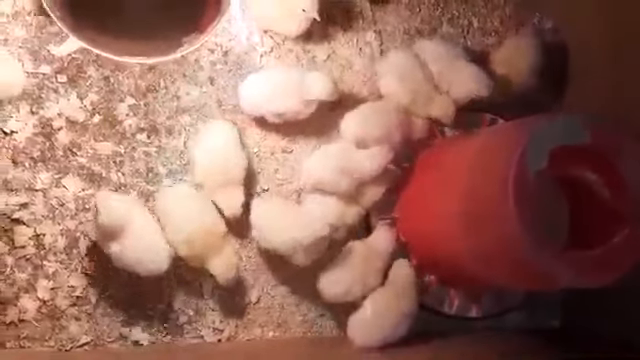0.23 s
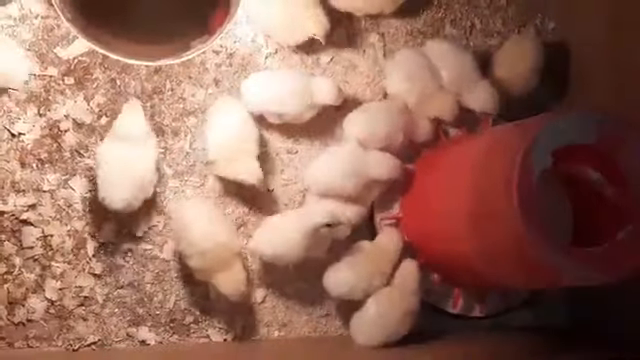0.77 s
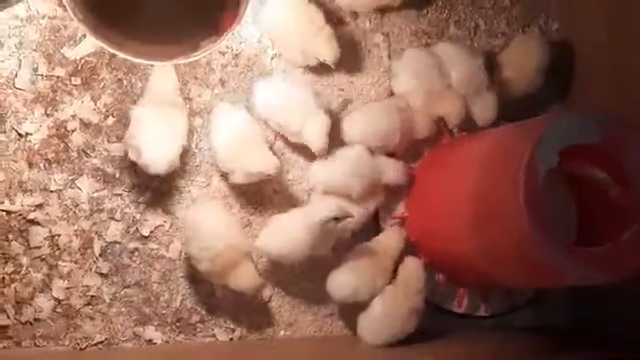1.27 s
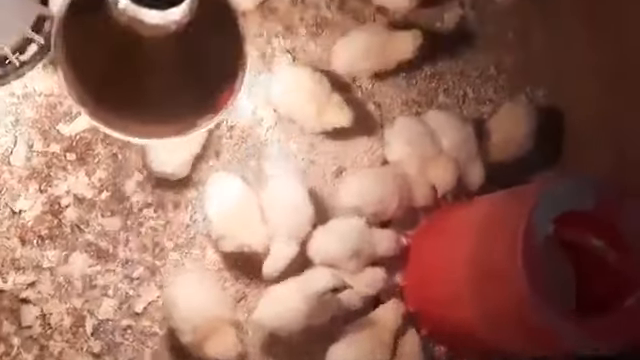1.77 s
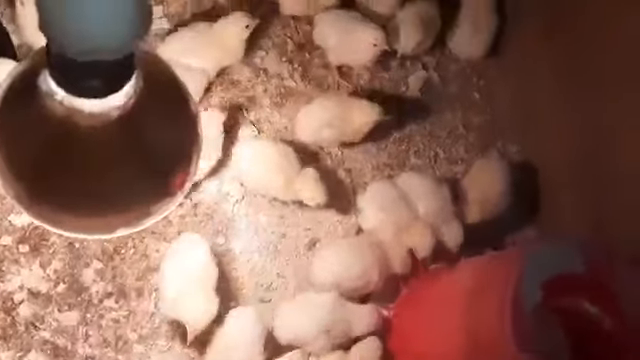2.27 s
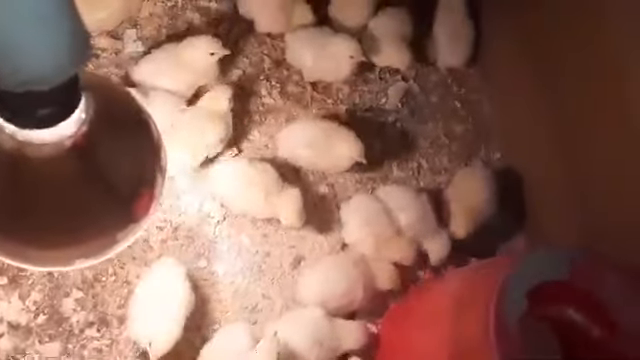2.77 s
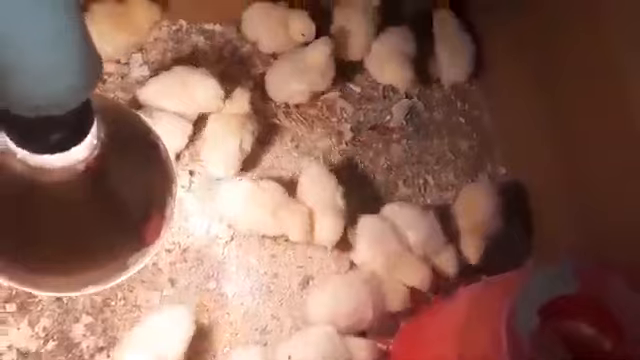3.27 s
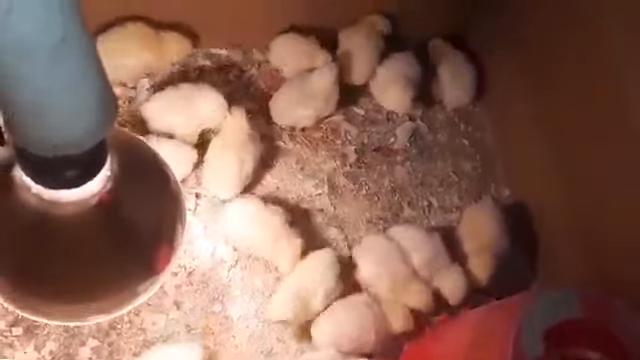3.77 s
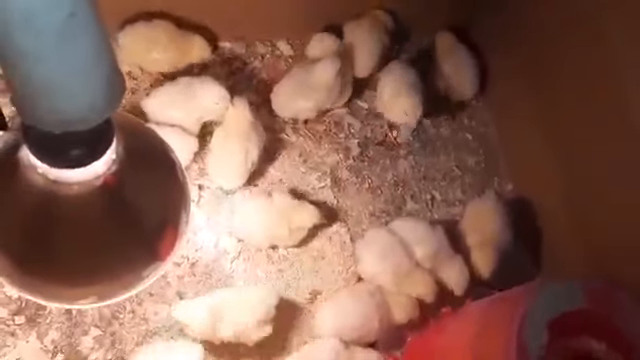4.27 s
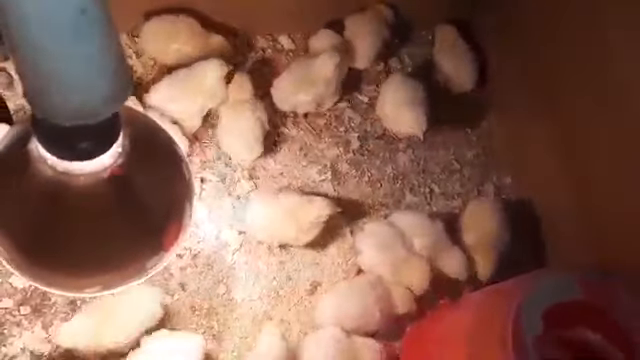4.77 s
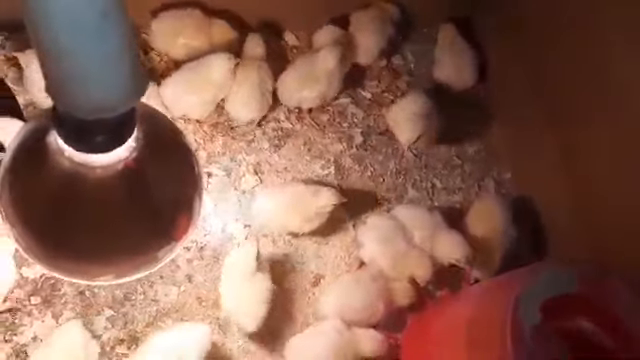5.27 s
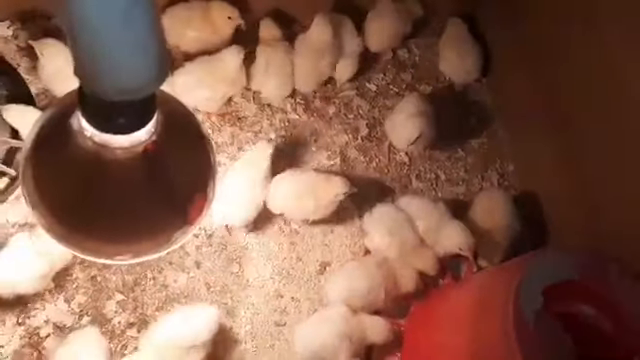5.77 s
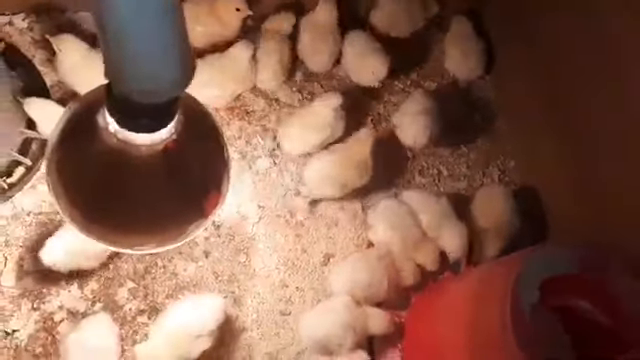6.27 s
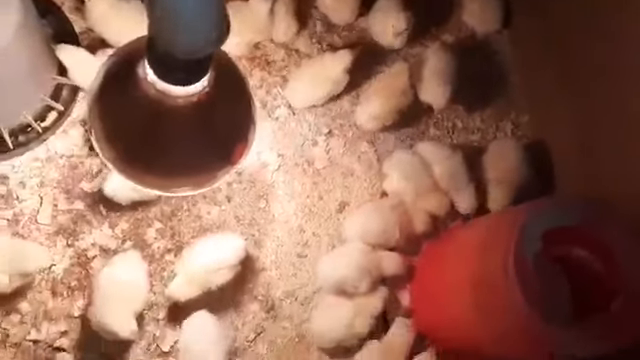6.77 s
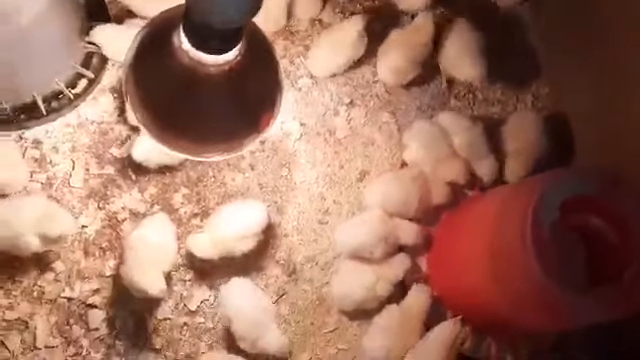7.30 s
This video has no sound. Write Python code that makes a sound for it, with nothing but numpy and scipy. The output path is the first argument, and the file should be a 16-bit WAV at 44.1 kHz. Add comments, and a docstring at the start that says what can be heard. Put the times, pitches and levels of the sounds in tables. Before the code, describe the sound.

A flock of young chicks peeps constantly in a wooden brooder, with rustling litter, small ticks and pecks, and occasional soft boomy knocks.

```python
"""A flock of chicks peeps in a wooden brooder, heard from above, over rustling litter and quiet air.
From the start short falling whistles and a few rising chirps ring out, smeared by the walls and the room;
soft knocks boom in the box from the first moment, then come dry ticks, gritty rakes and dull pecks.
Trills, gliding tones with a zigzag pitch, join after a second; one chick squeals at about two seconds.
The two strongest knocks fall at about 5 and 6.4 s; peeps and stirring go on to the end."""
import sys
import numpy as np
from scipy import signal
from scipy.fft import rfft, irfft
from scipy.io import wavfile
from scipy.ndimage import uniform_filter1d

SR = 44100
rng = np.random.default_rng(int(sys.argv[2]) if len(sys.argv) > 2 else 0)


def dump_mix(stems):
    """Bounce the given channels to the path in sys.argv[1] as a 16-bit WAV at rate SR."""
    frames = np.atleast_2d(stems).T  # one column per channel
    limited = np.clip(frames, -1, 1)  # hard clip at full scale
    pcm = np.round(limited * 32767).astype(np.int16)
    wavfile.write(sys.argv[1], SR, pcm)


N = 332514
TIME = np.arange(N) / SR


def amp(db):
    """Decibels to an amplitude factor."""
    return 10 ** (np.asarray(db) / 20)


def unit(x):
    """Scale to an RMS of one."""
    return x / np.sqrt(np.mean(x ** 2) + 1e-20)


def read(points, hz):
    """Read a curve of (f/Hz, value) points along a logarithmic frequency axis."""
    f, value = np.transpose(points)
    return np.interp(np.log(hz + 1), np.log(f + 1), value)


def colour(x, points):
    """Equalise a sound with a curve of (f/Hz, gain/dB) points."""
    gain = amp(read(points, np.fft.rfftfreq(x.shape[-1], 1 / SR)))
    return irfft(rfft(x) * gain, x.shape[-1])


def pan(db):
    """Left and right gains that differ by db; positive is louder on the left."""
    return unit(amp([[db / 2], [-db / 2]]))


def add(mix, s, sound):
    """Lay a sound into the mix at s seconds, cut off at the end of the mix."""
    part = mix[:, max(round(s * SR), 0):][:, :sound.shape[-1]]
    part += sound[..., :part.shape[1]]


def narrow(x, corner_hz=650):
    """Long waves reach both microphones alike; short ones differ."""
    f = np.fft.rfftfreq(x.shape[-1], 1 / SR)
    side_gain = (f + 30) / np.hypot(f + 30, corner_hz)
    side = irfft(rfft(x[1]) * side_gain, x.shape[-1])
    return np.array([x[0] + side, x[0] - side])


def room(x):
    """Dense echoes, other ones at each microphone, each band dying at its own speed."""
    # reverberation time of the room: (f/Hz, t60/s)
    room_t60 = [(200, 0.48), (1000, 0.51), (3000, 0.31), (6000, 0.3), (14000, 0.15)]
    hz, t, z = signal.stft(rng.standard_normal((2, SR // 2)), SR, nperseg=256)
    fade = amp(-60 * t / read(room_t60, hz)[:, None])
    build_up = 1 - np.exp(-t / 0.014)
    tail = signal.istft(z * fade * build_up, SR, nperseg=256)[1]
    # about unit gain where the chicks call, 2400 to 4000 Hz (bins 1 Hz apart)
    in_band = abs(rfft(tail, SR))[:, 2400:4000]
    tail = tail / np.sqrt(np.mean(in_band ** 2))
    return signal.oaconvolve(x, tail, axes=1)[:, :N]


def walls(x, count=4, strength=.55):
    """A few early reflections, drawn anew for each call: they beat against a gliding tone."""
    taps = np.zeros((2, SR // 60))
    for side in taps:
        delays = rng.integers(SR // 600, SR // 70, count)
        side[delays] = strength * rng.choice([-1, 1], count) / np.sqrt(count)
    # the direct sound reaches the right a little before or after the left
    taps[0, 14] = taps[1, rng.integers(0, 28)] = 1
    heard = signal.fftconvolve(x[None], taps, axes=1)
    # each side keeps the energy of the dry call
    return heard * np.linalg.norm(x) / np.linalg.norm(heard, axis=1, keepdims=True)


def whistle(hz, crest, waver=0.0085, fullness=0.37):
    """A chick's syrinx: a nearly pure tone that swells to its crest and fades, fluttering a little."""
    # second and third harmonic of a call, typical value: (level/dB, level/dB)
    overtones_db = (-29.5, -37.5)
    drift, flutter = unit(uniform_filter1d(rng.standard_normal((2, len(hz))), SR // 200))
    phase = 2 * np.pi * np.cumsum(hz * (1 + waver * drift)) / SR
    second_db, third_db = overtones_db + rng.normal(0, 2, 2)
    tone = np.sin(phase) + amp(second_db) * np.sin(2 * phase) + amp(third_db) * np.sin(3 * phase)
    flutter_gain = amp(2.8 * uniform_filter1d(flutter, SR // 500))
    # warped time puts the top of the half sine at the crest; a low fullness exponent flattens it
    u = np.interp(np.linspace(0, 1, len(hz)), [0, np.clip(crest, .1, .9), 1], [0, .5, 1])
    swell = abs(np.sin(np.pi * u)) ** fullness
    return unit(tone * flutter_gain * swell)


def glide(length, first, middle, last):
    """Pitch bends smoothly through three points."""
    u = np.linspace(0, 1, max(int(length * SR), 200))
    return np.polyval(np.polyfit([0, .5, 1], [first, middle, last], 2), u)


def bowed_glide(length, first, last, bow):
    """A glide whose middle lies above a straight line by bow, a share of the mean pitch."""
    return glide(length, first, (first + last) / 2 * (1 + bow), last)


def still_air(level_db=-68):
    """The quiet floor of the room: steady coloured noise, wider in the treble."""
    # tone of the air: (f/Hz, gain/dB)
    air_colour = [(20, -22), (38, -1), (50, 26.5), (65, 3.5), (120, 17), (300, -26), (1000, -11),
                  (5000, -7.5), (15000, -61)]
    return amp(level_db) * unit(colour(narrow(rng.standard_normal((2, N))), air_colour))


def crackle(per_s, spread, wash, low_hz, high_hz, cycles, count=22):
    """Many tiny contacts of unequal size, each ringing at its band's pitch, over a steady wash of noise."""
    out = np.zeros((2, N))
    for hz in np.geomspace(low_hz, high_hz, count):
        t = np.arange(int(5 * cycles / hz * SR)) / SR
        grain = np.exp(-t * hz / cycles) * np.sin(2 * np.pi * hz * t) * np.sqrt(hz)
        # small, high-pitched contacts are the most common; only the top band gets its full share
        share = hz / high_hz
        contacts = int(per_s * share * N / SR / count)
        when, size, left, right = rng.random((6000, 4))[:contacts].T
        strength = amp(spread * np.minimum(-np.log(size), np.pi))
        hits = np.zeros((2, N))
        hits[:, (when * N).astype(int)] = strength * (np.array([left, right]) - .5)
        out += signal.oaconvolve(hits, grain[None], axes=1)[:, :N]
    noise = colour(rng.standard_normal((2, N)), [(high_hz, 0), (high_hz * 2, -12)])
    return unit(out) + wash * unit(noise)


def footwork():
    """Strength of rustle and shuffle: each step swells quickly and fades over the steady stirring."""
    # the flock's steady stirring, before the litter's trims: (t/s, crisp rustle level/dB, dull shuffle level/dB)
    stirring = [(0, -62.5, -62.5), (.65, -62, -60), (1.0, -60.5, -54.5), (1.38, -65.5, -60.5),
                (1.55, -60.5, -57), (2.2, -60.5, -58.5), (2.34, -67, -65), (3.1, -61, -63.5),
                (3.68, -64, -69), (3.95, -63.5, -59.5), (4.38, -64.5, -78), (5.3, -67, -66.5),
                (5.82, -66.5, -70.5), (6.15, -57.5, -56), (6.55, -67, -71), (7.0, -65, -66.5),
                (7.25, -59.5, -57), (7.54, -60, -52.5)]
    # single steps that stand out, before the same trims:
    # (t/s, length/s, crisp rustle level/dB, dull shuffle level/dB)
    steps = [(.16, 0.25, -69, -75), (0.778, 0.12, -62, -53.5), (0.872, 0.068, -63, -52),
             (1.265, 0.16, -71, -52), (1.574, 0.25, -66, -56), (1.947, 0.11, -59, -74),
             (2.363, 0.11, -55, -61), (2.44, 0.067, -54.5, -53), (2.59, 0.11, -61.5, -81),
             (2.832, .13, -76, -54), (3.54, 0.13, -70, -56.5), (3.804, 0.089, -65, -51.5),
             (3.949, 0.092, -60.5, -58.5), (4.131, 0.17, -52.5, -57.5), (4.439, 0.1, -60, -66),
             (4.645, 0.22, -59.5, -66), (4.895, 0.29, -61, -56.5), (5.255, .11, -62.5, -55.5),
             (5.459, 0.16, -59.5, -56.5), (5.601, 0.17, -55.5, -59), (5.842, 0.21, -60.5, -63.5),
             (6.037, .07, -58, -54), (6.219, 0.11, -62, -53), (6.393, 0.16, -64, -61.5),
             (6.574, 0.18, -58, -53), (6.753, 0.14, -63, -58.5), (6.879, 0.087, -57, -54.5),
             (7.014, 0.1, -60, -60)]
    step_crest = 0.23  # where a step is loudest, as a share of its length
    s, crisp_db, dull_db = np.transpose(stirring)
    power = amp([np.interp(TIME, s, crisp_db), np.interp(TIME, s, dull_db)]) ** 2
    for start, length, crisp, dull in steps:
        swell = np.interp(np.linspace(0, 1, int(length * SR)), [0, step_crest, 1], [0, 1, 0])
        add(power, start, amp([[crisp], [dull]]) ** 2 * np.sin(np.pi / 2 * swell) ** 2)
    return np.sqrt(power)


def litter(rustle_db=4.5, shuffle_db=2.5, side_db=3, scratch_db=1.3):
    """Feet stir the shavings in short scratches and scuff the floor beneath."""
    # tone of the crisp shavings: (f/Hz, gain/dB)
    rustle_colour = [(900, -1.5), (2000, -1.5), (4500, 4), (6000, -2), (7800, -1), (9000, -6.5),
                     (11500, -4), (14000, -8), (15200, -13)]
    # tone of the dull scuffs: (f/Hz, gain/dB)
    shuffle_colour = [(40, -45), (80, 9), (200, -1.5), (360, -1), (560, 1), (1000, -5.5), (1600, -11),
                      (2500, -7.5), (5000, -42)]
    crisp, dull = footwork()
    snaps = crackle(per_s=9000, spread=3.4, wash=1.3, low_hz=2000, high_hz=14000, cycles=5)
    scuffs = crackle(per_s=2600, spread=3.0, wash=.7, low_hz=130, high_hz=2400, cycles=7)
    slow_noise = uniform_filter1d(rng.standard_normal(N), SR // 50)
    scratches = unit(uniform_filter1d(slow_noise, SR // 250))
    rustle = unit(colour(snaps, rustle_colour)) * crisp * amp(rustle_db + scratch_db * scratches)
    shuffle = unit(colour(narrow(scuffs), shuffle_colour)) * dull * amp(shuffle_db)
    return pan(side_db) * rustle + shuffle


def rakes(level_db=0, grain_db=2.5):
    """A foot rakes through the shavings: a quick, gritty swish that swells early and dies away."""
    # rakes: (t/s, length/s, level/dB, brightest f/Hz)
    rake_table = [(0.754, 0.075, -60, 8000), (2.365, 0.18, -65, 11000), (4.15, 0.075, -56, 7500),
                  (4.627, .13, -54.5, 11300), (5.625, .13, -70, 7000)]
    out = np.zeros((2, N))
    for s, length, db, hz in rake_table:
        u = np.linspace(0, 1, int(length * SR))
        grit = unit(uniform_filter1d(rng.standard_normal(len(u)), SR // 300))
        noise = rng.standard_normal((2, len(u)))
        swish = unit(colour(noise, [(hz / 8, -22), (hz, 0), (hz * 2, -8)]))
        envelope = unit(amp(grain_db * grit) * u * (1 - u) ** 2)
        add(out, s, amp(db + level_db) * swish * envelope)
    return out


def pecks(level_db=1, decay=0.0045, room_db=-7):
    """A beak hits a board under the litter: one broad, damped resonance, shaped from noise."""
    # duller pecks on the boards: (t/s, onset level/dB before trim, f/Hz)
    peck_table = [(.893, -43.5, 800), (1.597, -42, 700), (2.105, -54, 990), (2.39, -40.5, 1110),
                  (2.462, -38.5, 1070), (2.854, -44.5, 756), (3.745, -48, 980), (4.437, -47.5, 1060),
                  (4.457, -41, 900), (6.073, -46.5, 1100), (6.246, -56, 1000), (6.608, -40.5, 1000),
                  (6.626, -45, 1110), (6.78, -47, 1030)]
    out, t = np.zeros((2, N)), np.arange(SR // 20) / SR
    for s, db, hz in peck_table:
        resonance = [(hz / 4, -20), (hz, 0), (hz * 2, -12), (hz * 8, -40)]
        burst = unit(colour(narrow(rng.standard_normal((2, len(t)))), resonance))
        add(out, s, amp(db + level_db) * burst * np.exp(-t / decay))
    return out + amp(room_db) * room(out)


def ticks(level_db=-10, decay=0.014, room_db=-4):
    """Beaks and claws snap a shaving: a bright noise burst with a very short decay."""
    # dry ticks: (t/s, onset level/dB before trim, left-right/dB before halving)
    tick_table = [(0.1873, -38, -1), (0.2275, -41, 2), (0.5425, -34, -6), (0.636, -37.5, -3),
                  (0.893, -33, -2), (0.9057, -35, 0), (1.491, -42, -13), (1.503, -33.5, -6),
                  (1.917, -45, -15), (1.9723, -38, -1), (2.0475, -36, 1), (2.103, -37, -1),
                  (2.3652, -36, 1), (2.387, -39, 6), (2.459, -39.5, -14), (3.0327, -46, -6),
                  (3.8248, -35, -9), (4.1535, -34, 4), (4.1859, -25.5, -3), (4.4591, -38.5, -2),
                  (4.9556, -36, -3), (5.86, -38, -15), (6.0462, -41, 3), (7.5198, -39, -3)]
    # tone of a tick: (f/Hz, gain/dB)
    tick_colour = [(300, 4), (1500, 4.5), (4300, 16.5), (6500, 2.5), (8000, 6.5), (12000, 1.5),
                   (15000, -14)]
    out, t = np.zeros((2, N)), np.arange(SR // 30) / SR
    for s, db, side_db in tick_table:
        burst = unit(colour(rng.standard_normal((2, len(t))), tick_colour))
        add(out, s, amp(db + level_db) * pan(side_db / 2) * burst * np.exp(-t / decay))
    return out + amp(room_db) * room(out)


def knocks(ring_db=-2, boom_db=-11, boom_t60=0.6, rise=0.0032):
    """A soft blow rings the low modes of the box; a boom of dark noise lingers with them."""
    # soft knocks: (t/s, level/dB before trims, hardness as corner f/Hz, ring length as a factor, deep bass/dB)
    knock_table = [(0.0, -39.5, 215, 0.94, 2.5), (.156, -37.5, 252, 1, 1), (.276, -35, 278, 0.74, -3),
                   (0.543, -36, 336, 0.28, -4), (0.89, -30, 573, 0.2, -10), (1.575, -44.5, 463, 1.36, -8),
                   (2.261, -48.5, 296, 0.91, 6), (3.307, -50, 350, 0.57, 9.5), (3.548, -38.5, 173, 0.86, 6),
                   (3.813, -47.5, 300, 1, -3), (4.016, -32.5, 183, 0.9, 6.5), (4.916, -48, 217, 1.1, 7),
                   (4.977, -25, 260, 0.76, 0.5), (5.387, -36.5, 241, 0.91, 2), (5.606, -34.5, 171, 1.01, 7),
                   (6.207, -43, 298, 1.25, 4), (6.442, -23, 264, 0.89, -7.5), (6.865, -38.5, 235, 1.2, -1),
                   (7.041, -38.5, 226, 0.95, -18)]
    # modes of the box: (f/Hz, level/dB, t60/s before the ring length factor)
    box_modes = [(83.86, -8.5, 0.58), (92, -43, 0.38), (133.5, -8, 0.38), (150.4, -2, 0.38),
                 (182, 2.5, 0.068), (203.4, 1, 0.36), (224.3, -6.5, 0.25), (283.4, -4, 0.5),
                 (395, -11, 0.49), (474, -12, 0.4), (560, 0.5, 0.27), (800, -5, 0.24)]
    # tone of the boom: (f/Hz, gain/dB)
    boom_colour = [(40, -62), (75, 0), (130, -1), (220, -1), (310, 6), (380, -52), (520, 0), (900, -8),
                   (2000, -22)]
    out, t = np.zeros((2, N)), np.arange(SR * 3 // 4) / SR
    for s, db, corner_hz, hold, bass_db in knock_table:
        def blow(hz):
            """A soft contact spares the high modes; a blow near a wall spares the lowest."""
            bass = amp(bass_db / (1 + (hz / 110) ** 6))
            return bass / (1 + (hz / corner_hz) ** 3)

        fade_db = -60 * t / max(hold, .1)  # divided by a t60 below
        ring = 0
        for hz, mode_db, t60 in box_modes:
            ring = ring + blow(hz) * amp(mode_db + fade_db / t60) * np.cos(2 * np.pi * hz * t)
        air = colour(narrow(rng.standard_normal((2, len(t)))), boom_colour)
        air = unit(irfft(rfft(air) * blow(np.fft.rfftfreq(len(t), 1 / SR)), len(t)))
        boom = air * amp(boom_db + fade_db / boom_t60) * (1 - np.exp(-t / 0.0077))
        onset = 1 - np.exp(-t / rise)
        add(out, s, amp(db) * (amp(ring_db) * ring + boom) * onset)
    return out


def far_chicks(level_db=0, pitch_hz=2970, side_db=-2, count=150):
    """The rest of the flock: faint falling peeps merged by the room."""
    # how busy the far part of the flock is: (t/s, level/dB before the room)
    flock_level = [(0, -45), (.65, -58), (.85, -46.5), (1.3, -59.5), (1.65, -49.5), (2.15, -51.5),
                   (2.45, -52.5), (2.75, -47.5), (3.3, -45.5), (3.85, -51), (4.4, -46), (5.12, -72),
                   (5.5, -45), (5.85, -62.5), (6.35, -45), (6.9, -60), (7.54, -45.5)]
    out = np.zeros((2, N))
    for k, (when, pitch, length, size) in enumerate(rng.uniform(-1.1, 1, (count, 4))):
        hz = pitch_hz * (1 + .12 * pitch) * glide(.06 + length / 50, 1.11, 1.01, .87)
        add(out, (k + when) / count * N / SR, amp(1.4 * size) * whistle(hz, 1 / 2))
    busy_db = np.interp(TIME, *np.transpose(flock_level))
    return pan(side_db) * room(unit(out) * amp(level_db + busy_db))


def trills(direct_db=-7, room_db=-2):
    """Chicks that face away: pitch swings in quick, uneven zigzags; mostly the echoes are heard."""
    # quick warbles: (t/s, length/s, centre f/Hz, nominal swing/Hz, warble rate/Hz,
    # level/dB before trims, left-right/dB)
    trill_table = [(1.225, 0.062, 3360, 496, 41, -42.5, -8), (1.986, 0.044, 3914, 625, 36, -36.5, -8),
                   (3.191, 0.15, 3125, 575, 36, -47.5, -20), (3.919, 0.065, 3000, 400, 33, -45, -3),
                   (5.492, 0.0745, 3260, 454, 35, -40.5, -10), (5.643, .11, 3285, 967, 27, -37.5, -7.5),
                   (7.179, 0.087, 1970, 205, 33, -54.5, -7)]
    out = np.zeros((2, N))
    for s, length, centre, swing, rate, db, side_db in trill_table:
        t = np.arange(int(length * SR)) / SR
        depth = np.interp(t, np.linspace(0, length, 6), rng.uniform(.75, 1.3, 6))
        # each warble rises for a third of its time and falls for the rest
        hz = centre + swing * depth * signal.sawtooth(2 * np.pi * rate * t, 1 / 3)
        call = whistle(hz, 1 / 2, fullness=1 / 2)
        add(out, s, amp(db) * pan(side_db) * walls(call))
    return amp(direct_db) * out + amp(room_db) * room(out)


def calls():
    """Every peep and chirp, and the squeal, as (start s, level dB, left-right dB, sound before its level)."""
    # falling peeps of the nearer chicks:
    # (t/s, length/s, first f/Hz, last f/Hz, level/dB before trims, left-right/dB)
    peep_table = [(.002, 0.045, 3395, 2720, -48, -2), (.151, .044, 3200, 2660, -49, -5),
                  (.197, 0.059, 3530, 2890, -43.5, -9), (.262, 0.056, 3490, 2416, -40, -3),
                  (.357, 0.056, 2895, 2470, -44, -3), (.465, 0.047, 3500, 2870, -47.5, -9),
                  (.595, 0.057, 2800, 2510, -54.5, -15), (.717, .075, 3410, 2875, -50.5, -11),
                  (.808, .048, 3630, 3180, -50, 5), (.839, 0.05, 3200, 2530, -40.5, -6),
                  (.958, 0.041, 3400, 2800, -55, -7), (1.25, 0.036, 2760, 2526, -49.5, -14),
                  (1.42, 0.054, 3124, 2560, -44, -13), (1.556, 0.059, 3510, 2620, -47, -9),
                  (1.735, 0.074, 3440, 2574, -47, -8), (1.936, 0.046, 2880, 2410, -49.5, -3),
                  (2.222, 0.069, 3730, 2780, -46.5, -5), (2.385, 0.05, 3520, 2580, -40, -7),
                  (2.512, 0.038, 3800, 3250, -58, 9), (2.527, 0.051, 3060, 2550, -36.5, 0),
                  (2.562, 0.039, 3630, 3270, -50, -10), (2.642, 0.07, 3194, 2700, -41, 0),
                  (2.7, 0.042, 2750, 2090, -47, -4), (2.767, .05, 4250, 3280, -49.5, -6),
                  (2.8, 0.06, 3400, 2970, -41.5, -8), (2.818, .035, 4600, 3770, -56, -3),
                  (2.825, 0.047, 2980, 2490, -39.5, 0), (2.892, 0.048, 3040, 2730, -48, -16),
                  (2.968, 0.057, 4650, 3200, -41, -4), (3.017, 0.033, 3400, 2204, -37.5, -1),
                  (3.105, 0.04, 3250, 2610, -38, -3.5), (3.188, 0.052, 3350, 2554, -47.5, -6),
                  (3.2, .04, 3590, 3080, -44, -9), (3.295, .055, 3060, 2960, -49.5, -16),
                  (3.385, 0.041, 3130, 2725, -42, -7), (3.43, .05, 2850, 2530, -49.5, -4),
                  (3.465, 0.066, 4380, 3100, -49.5, 1), (3.53, .048, 2970, 2460, -45.5, -8),
                  (3.551, 0.052, 3215, 2816, -37.5, 1), (3.572, 0.073, 2510, 1934, -46, -4),
                  (3.59, .052, 3515, 2810, -42.5, -7), (3.597, 0.04, 4100, 3420, -54.5, -7),
                  (3.715, 0.058, 2655, 2380, -42, -1), (3.78, 0.045, 3130, 2520, -40.5, -7),
                  (4.018, 0.061, 3380, 2510, -40, -6), (4.122, 0.06, 3166, 2530, -48.5, 0),
                  (4.125, 0.062, 4790, 3600, -55.5, -19), (4.23, .085, 3020, 2540, -45, -6),
                  (4.276, 0.038, 3660, 3200, -45.5, -13), (4.317, 0.043, 4020, 3300, -56.5, -12.5),
                  (4.385, 0.042, 3216, 3000, -35.5, -21), (4.465, 0.072, 2775, 2420, -50.5, 2),
                  (4.494, 0.077, 1970, 1904, -58.5, -10), (4.512, 0.039, 3960, 3130, -44.5, -8),
                  (4.535, 0.045, 3040, 2390, -49, -3), (4.668, 0.032, 3140, 2720, -39, -2),
                  (4.712, 0.034, 3230, 2550, -39.5, -10), (4.747, 0.061, 2770, 2480, -47, 4),
                  (4.767, 0.071, 3166, 2723, -43, -2), (4.86, 0.052, 2640, 2310, -52.5, -10),
                  (4.914, 0.039, 2970, 2550, -42, -7), (4.924, 0.056, 3470, 3070, -45.5, -2),
                  (4.96, 0.048, 3180, 2580, -36, -4), (4.985, .045, 3970, 3150, -46, -12),
                  (5.038, 0.045, 3500, 2560, -40.5, -8), (5.226, 0.045, 4210, 3040, -45, -7),
                  (5.249, 0.043, 3150, 2457, -39, 0), (5.374, .048, 3157, 2680, -43, -3.5),
                  (5.512, 0.041, 3360, 2610, -38, -1), (5.555, 0.046, 4160, 3210, -44.5, -4),
                  (5.56, 0.081, 3204, 2455, -46, -1), (5.615, 0.056, 3710, 3200, -47, -1),
                  (5.638, 0.045, 2990, 2055, -45.5, -5), (5.988, 0.069, 2920, 2605, -53.5, -5),
                  (6.025, .085, 4470, 3600, -53.5, -14), (6.083, 0.048, 3580, 2327, -41.5, -3.5),
                  (6.174, 0.063, 2856, 2450, -49.5, -8), (6.197, 0.047, 3290, 2910, -48, -4),
                  (6.265, 0.043, 3645, 2930, -50.5, -12), (6.388, 0.054, 3600, 3070, -41, -4),
                  (6.543, 0.035, 3345, 2450, -40.5, -4), (6.568, 0.08, 4500, 3520, -51.5, -10),
                  (6.637, 0.029, 3100, 2340, -43, -6), (6.679, .06, 2916, 2510, -48, 0),
                  (6.698, 0.043, 3620, 2970, -48, -4), (6.84, .058, 3890, 2810, -47, 1),
                  (6.954, 0.074, 2114, 2005, -52.5, -5), (7.033, 0.04, 2560, 2320, -54.5, -8),
                  (7.087, 0.084, 3450, 2670, -54.5, -9), (7.179, 0.028, 3060, 2560, -40, -5),
                  (7.268, 0.037, 3120, 2850, -53, -14), (7.445, .055, 3720, 3160, -54.5, -14),
                  (7.48, .052, 3200, 2480, -50.5, -13)]
    # rising chirps:
    # (t/s, length/s, first f/Hz, last f/Hz, level/dB before trims, left-right/dB)
    chirp_table = [(.2, 0.057, 2560, 3146, -39.5, -4), (.39, 0.036, 3150, 3980, -44, 1),
                   (.992, .058, 2676, 3210, -44.5, -7), (1.527, 0.041, 2366, 2860, -47.5, -2),
                   (1.878, 0.04, 3030, 3700, -49.5, 0), (2.048, 0.06, 2590, 3236, -41.5, -6),
                   (2.353, 0.046, 2916, 3440, -44, -2), (3.682, 0.06, 2950, 3860, -45, -3),
                   (4.72, .025, 3250, 3860, -41.5, -2), (5.472, .057, 3200, 3460, -46.5, -5),
                   (7.338, .075, 2560, 3060, -60, -12), (7.391, 0.062, 3200, 3770, -56.5, -10)]
    # path of one startled squeal: (t/s, f/Hz, level/dB before trims)
    squeal_path = [(1.964, 3900, -35), (1.979, 4100, -42), (1.984, 3950, -25.5), (1.990, 3880, -24.5),
                   (1.996, 4550, -40), (2.005, 4550, -36), (2.019, 3210, -29), (2.028, 3050, -35)]
    # upward bow of a glide, as a share of its pitch; loudest point, as a share of its length
    peep_bow, chirp_bow, crest = 0.0217, 0.0257, 0.62
    squeal_side_db = -8
    for table, bow in ((peep_table, peep_bow), (chirp_table, chirp_bow)):
        for s, length, first, last, db, side_db in table:
            yield s, db, side_db, whistle(bowed_glide(length, first, last, bow), crest)
    s, hz, db = np.transpose(squeal_path)
    t = np.arange(s[0], s[-1], 1 / SR)
    squeal = whistle(np.interp(t, s, hz), 1 / 2, fullness=.15)
    squeal = squeal * amp(np.interp(t, s, db) - db.max())
    yield s[0], db.max(), squeal_side_db, squeal


def near_chicks(direct_db=2.5, room_db=-5):
    """Single calls, straight from the beak with wall reflections, and by way of the room."""
    # a call of usual level, and the dB its echo gains for each dB more: far chicks sound wetter
    typical_db, room_follows = -46, 0.77
    direct, sent = np.zeros((2, 2, N))
    for s, db, side_db, call in calls():
        add(direct, s, amp(db) * pan(side_db) * walls(call))
        sent_db = typical_db + room_follows * (db - typical_db)
        add(sent, s, amp(sent_db) * pan(side_db / 2) * call)
    return amp(direct_db) * direct + amp(room_db) * room(sent)


def scene():
    """The air and the litter, the touches on litter and box, and the flock, summed."""
    ground = still_air() + litter() + rakes()
    touches = pecks() + ticks() + knocks()
    chicks = far_chicks() + trills() + near_chicks()
    return ground + touches + chicks


def record(dry):
    """The microphone drops the deepest bass; then the recorder's band limit."""
    band_low_hz, band_high_hz = 46, 15150
    bass_cut = signal.butter(3, band_low_hz, "high", fs=SR, output="sos")
    heard = signal.sosfilt(bass_cut, dry)
    treble_cut = signal.firwin(511, band_high_hz, window=("kaiser", 9), fs=SR)
    return signal.oaconvolve(heard, treble_cut[None], "same")


dry = scene()
out = record(dry)
dump_mix(out)
```